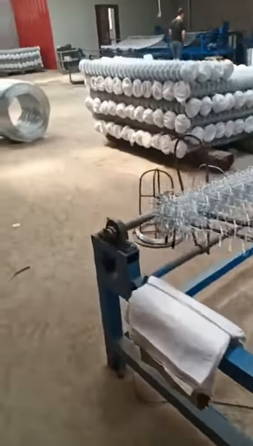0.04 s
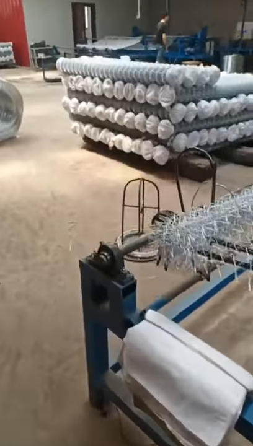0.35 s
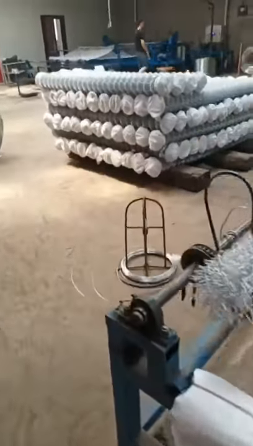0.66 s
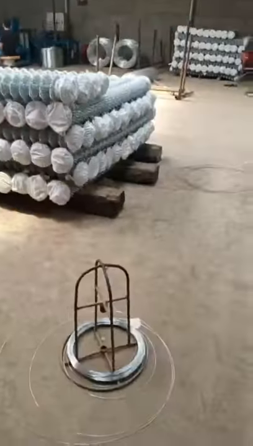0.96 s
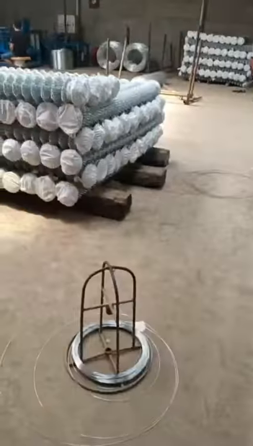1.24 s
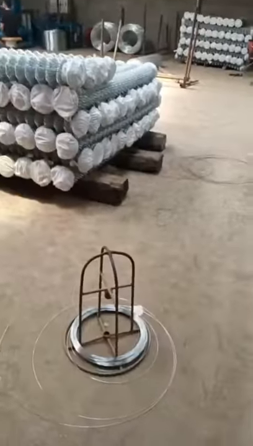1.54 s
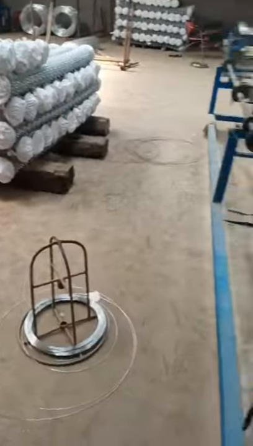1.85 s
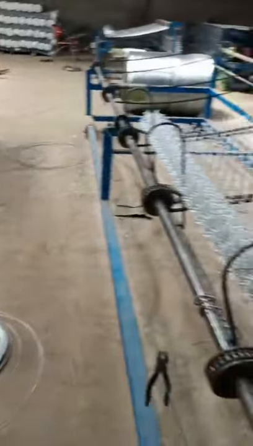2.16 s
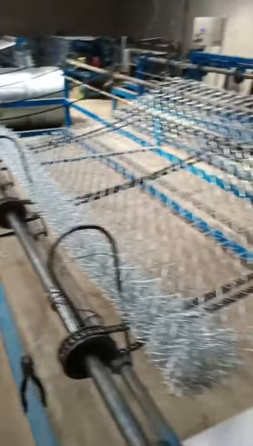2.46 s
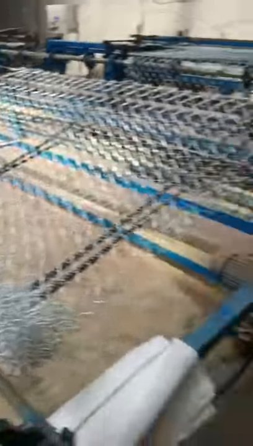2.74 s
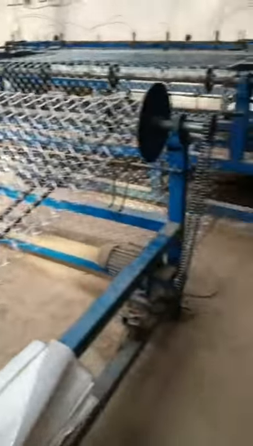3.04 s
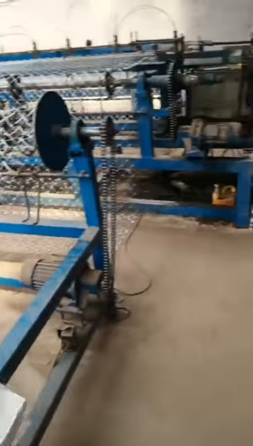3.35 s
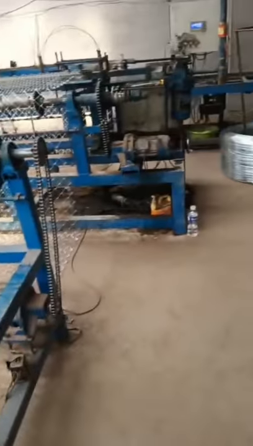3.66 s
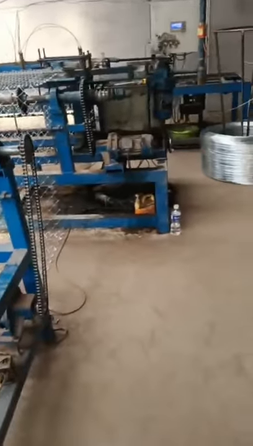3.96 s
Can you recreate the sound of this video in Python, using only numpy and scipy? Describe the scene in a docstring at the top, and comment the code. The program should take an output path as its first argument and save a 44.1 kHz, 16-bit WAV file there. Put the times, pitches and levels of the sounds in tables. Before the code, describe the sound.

Dense metallic din of wire weaving machines, with hissing wire and a few heavy crashes.

```python
"""Wire-mesh weaving machines run in a hard factory hall while a microphone is carried past them.
From the start, drives rumble, far machines roar, metal knocks merge into a din and wire hisses over
spinning formers. Near 0.6 s a heavy stroke crashes and steel clinks; then the sound cuts out briefly.
From 1 s on come more strokes and dull clunks of frames, and from 2.5 s air buffets the microphone.
Near 3 s a wire squeals between two small dips in level, and the brightest crash follows at 3.3 s."""
import sys
import numpy as np
from scipy import signal
from scipy.fft import rfft, irfft
from scipy.io import wavfile
from scipy.ndimage import uniform_filter1d

SR = 44100
rng = np.random.default_rng(int(sys.argv[2]) if len(sys.argv) > 2 else 0)


def digitize_waveform(pressure):
    """Quantize a signal to 16-bit integers and store it at the path in sys.argv[1].

    Rows of a 2-D input are taken as channels; values are limited to [-1, 1].
    """
    field = np.atleast_2d(pressure).T
    bounded = np.clip(field, -1, 1)
    quanta = np.round(bounded * 32767).astype(np.int16)
    wavfile.write(sys.argv[1], SR, quanta)


N = 176400  # 4 seconds

# the deep sound of shaking machine frames (frequency [Hz], relative level [dB])
FRAME_SPECTRUM = [(25, -36), (40, -40), (60, -13.5), (85, -7), (130, -1), (235, -2), (320, .3), (420, -3),
                  (540, -13.5), (800, -42), (1600, -60)]
# how metal knocks, both in the clatter and in the heavy strokes
METAL_KNOCKS = dict(per_second=900, spread_db=3.1, decay_s=0.021, wash_db=2)
OPPOSITE_SIDES = np.array([[1], [-1]])  # plus on the left, minus on the right


def undb(db):
    """Turn decibels into a factor to multiply a sound by."""
    return 10 ** (np.asarray(db) / 20)


def unit(x):
    """Scale a sound to an average strength (rms) of 1."""
    return x / np.sqrt(np.mean(x ** 2))


def clock():
    """The time of every sample in seconds."""
    return np.arange(N) / SR


def curve(rows, column=1):
    """One column of a table, joined by straight lines in time."""
    rows = np.array(rows)
    return np.interp(clock(), rows[:, 0], rows[:, column])


def response(points):
    """Join (frequency [Hz], level [dB]) points into a level for every frequency."""
    hz, db = np.array(points).T
    all_hz = np.maximum(np.fft.rfftfreq(N, 1 / SR), 1)
    return np.interp(np.log(all_hz), np.log(hz), db)


def colour(x, spectrum):
    """Give a sound a spectrum (its balance of low and high), at a strength of 1."""
    return unit(irfft(rfft(x) * undb(response(spectrum)), N))


def noise():
    """Unrelated noise for left and right."""
    return rng.standard_normal((2, N))


def drift(per_second):
    """A smooth random wobble with a typical size of 1."""
    hold = int(SR / per_second)
    steps = np.repeat(rng.standard_normal(2048)[:N // hold + 1], hold)
    return unit(uniform_filter1d(uniform_filter1d(steps, hold), hold)[:N])


def tone(hz, wander, per_second):
    """A pure note whose pitch drifts by the fraction `wander`."""
    pitch_hz = hz * (1 + wander * drift(per_second))
    return np.sqrt(2) * np.sin(2 * np.pi * np.cumsum(pitch_hz) / SR)


def envelope(start, rise_s, decay_s):
    """Loudness that rises in a straight line, then dies away."""
    age = clock() - start
    return np.clip(age / rise_s, 0, 1) * np.exp(-np.maximum(age - rise_s, 0) / decay_s)


def swell(start_s, length_s):
    """Loudness that rises and falls in a rounded arch."""
    progress = np.clip((clock() - start_s) / length_s, 0, 1)
    return 2 * np.sqrt(progress * (1 - progress))


def impacts(per_second, spread_db, decay_s, wash_db, places=4):
    """Many uneven hits at a few places, each place with its own echoes, over the hall's wash of noise."""
    size = undb(spread_db * np.minimum(rng.exponential(size=N), 5))
    push_or_pull = np.sign(rng.standard_normal(N))
    hits = (rng.random(N) < per_second / SR) * size * push_or_pull
    place = rng.integers(0, places, N)
    age = clock()[:SR // 10]
    heard = 0
    for k in range(places):
        echoes = rng.standard_normal((2, len(age))) * np.exp(-age / decay_s)
        heard = heard + signal.oaconvolve((hits * (place == k))[None], echoes, axes=1)[:, :N]
    return unit(unit(heard) + undb(wash_db) * noise())


def diffuse(pair, split_hz=520):
    """In the hall, left and right hear the same bass but unrelated treble."""
    middle, side = rfft(pair)
    alike = 1 / (1 + (np.fft.rfftfreq(N, 1 / SR) / split_hz) ** 6)
    mixed = middle * np.sqrt(1 + alike) + OPPOSITE_SIDES * side * np.sqrt(1 - alike)
    return irfft(mixed, N) / np.sqrt(2)


def drives():
    """Frames and gearboxes rumble; motors hum and gears whine through the hall."""
    # how loud the rumble is (time [s], relative level [dB])
    rumble_levels = [(0, -37), (.85, -36.5), (1.2, -35.5), (1.95, -37.5), (2.3, -40.5), (2.7, -36.5),
                     (3.25, -36.5), (3.55, -35.5), (4, -40)]
    # motor and gear notes (pitch [Hz], level [dB], wander [fraction of pitch])
    motor_notes = [(150.1, -50.5, 0.039), (197.9, -49.5, 0.0123), (1754, -49, 0.0018)]
    middle, side = colour(noise(), FRAME_SPECTRUM)
    rumble = middle + undb(-20) * side * OPPOSITE_SIDES  # almost the same on both sides
    out = rumble * undb(1 + curve(rumble_levels))
    for hz, db, wander in motor_notes:
        hum = [tone(hz, wander, per_second=39.88) * (1 + 0.34 * drift(7.93)) for _ in range(2)]
        out = out + undb(db) * diffuse(np.array(hum))
    return out


def far_machines():
    """The hall blurs the far machines into a dull roar."""
    # how loud the roar is (time [s], relative level [dB])
    roar_levels = [(0, -37.5), (.85, -36.5), (1.5, -37), (2.15, -42), (2.8, -38.5), (3.2, -40), (4, -40.5)]
    # the roar's dull sound (frequency [Hz], relative level [dB])
    roar_spectrum = [(150, -23), (420, -2), (800, 3), (1150, 3), (1700, -8), (4000, -38)]
    roar = colour(diffuse(noise()), roar_spectrum)
    return roar * undb(2 + curve(roar_levels) + 0.37 * drift(26.2))


def clatter():
    """Chains, cams and mesh knock hundreds of times a second, and some of the metal rings on."""
    # how loud the din is (time [s], relative level [dB])
    din_levels = [(0, -32.5), (.55, -34), (.8, -33), (1.45, -31), (2.0, -31.5), (2.2, -32.5), (3.2, -31),
                  (3.6, -30.5), (4, -31)]
    # the din's hard, bright sound (frequency [Hz], relative level [dB])
    din_spectrum = [(300, -23.5), (600, -11), (900, -5), (1350, 0.4), (2250, 0.5), (4100, -0.1), (4500, -4),
                    (5000, -11.5), (7000, -11.5), (15000, -45)]
    knocks = colour(diffuse(impacts(**METAL_KNOCKS)), din_spectrum)
    flicker_db = .45 * drift(18)
    din = knocks + undb(-9.5) * ringing_metal()
    return din * undb(5.5 + curve(din_levels) + flicker_db)


def ringing_metal(per_second=110, decay_s=0.027, low_hz=1607.4, high_hz=4298):
    """Struck wires and rods ring briefly, each at its own pitch."""
    out = np.zeros((2, N + SR))
    age = clock()[:SR // 5]
    fade_in = np.minimum(age / .002, 1)
    for when, pitch, size, left_phase, right_phase in rng.random((int(per_second * N / SR), 5)):
        hz = low_hz + pitch * (high_hz - low_hz)
        cycles = hz * age + np.array([[left_phase], [right_phase]])
        ring = np.sin(2 * np.pi * cycles) * np.exp(-age / decay_s)
        start = int(when * N)
        out[:, start:start + len(age)] += (.5 + size) * ring * fade_in
    return unit(out[:, :N])


def running_wire(turns_per_second=16.72, peak_s=1.033):
    """Wire scrapes over the formers (the spinning parts that bend it), surging once a turn."""
    # how loud the wire is (time [s], relative hiss level [dB], relative sizzle level [dB])
    wire_levels = [(0, -32, -37.5), (.2, -32, -40), (.47, -34, -40.5), (.68, -34.5, -42.5),
                   (.78, -31, -36.5), (.93, -29, -33), (1.95, -27.5, -31), (2.35, -28, -31.5),
                   (2.55, -28, -34.5), (2.9, -28.5, -34), (3.07, -26.5, -33), (3.3, -27.5, -34),
                   (3.8, -26, -32.5), (4, -28, -35.5)]
    # the wire's hiss (frequency [Hz], relative level [dB])
    hiss_spectrum = [(2500, -37), (4400, -9.5), (5100, -11), (6100, -8.5), (6900, -4.5), (7500, -1.3),
                     (7900, 0), (8400, -6), (9000, -11.5), (13000, -26.5)]
    # the even higher sizzle (frequency [Hz], relative level [dB])
    sizzle_spectrum = [(6000, -23), (8500, -9), (9600, -3), (13500, 1.5), (15500, 0.5)]
    surge = np.cos(2 * np.pi * turns_per_second * (clock() - peak_s))
    flicker_db = 0.64 * drift(24.64)
    scrapes = dict(per_second=2500, spread_db=2.1, decay_s=0.0045, wash_db=2)
    hiss = colour(impacts(**scrapes), hiss_spectrum)
    sizzle = colour(impacts(**scrapes), sizzle_spectrum)
    hiss_db = 3.5 + curve(wire_levels, column=1) + .45 * surge + flicker_db
    sizzle_db = 5 + curve(wire_levels, column=2) + .9 * surge + flicker_db
    return hiss * undb(hiss_db) + sizzle * undb(sizzle_db)


def heavy_strokes():
    """Heavy machine strokes, smeared by the hall: the frame booms and knocks, the mesh crashes."""
    # each stroke (start [s], rise [s], decay [s], boom [dB], knock [dB], crash [dB])
    strokes = [(.562, .028, .13, -32.5, -29.5, -28), (1.02, .018, .11, -33, -30, -33),
               (2.745, .015, .08, -33.5, -38, -40), (3.305, .014, .18, -48, -35, -23.3),
               (3.35, .025, .15, -36.5, -32.5, -37)]
    # the frame's knock (frequency [Hz], relative level [dB])
    knock_spectrum = [(200, -18), (450, -0.5), (720, 1), (1000, -5.5), (1350, 4), (2500, -29)]
    # the mesh's crash (frequency [Hz], relative level [dB])
    crash_spectrum = [(300, -17), (900, -8.5), (1900, 4), (2900, 0), (4000, 2.5), (4900, -4), (15000, -32)]
    boom = colour(diffuse(noise()), FRAME_SPECTRUM)
    knock = colour(diffuse(noise()), knock_spectrum)
    crash = colour(impacts(**METAL_KNOCKS), crash_spectrum)
    out = 0
    for start, rise_s, decay_s, boom_db, knock_db, crash_db in strokes:
        stroke = undb(boom_db) * boom + undb(knock_db) * knock + undb(crash_db) * crash
        out = out + envelope(start, rise_s, decay_s) * stroke
    return out


def steel_clinks(rise_s=.008):
    """Struck steel parts ring at their own pitch, wavering slightly and differently on left and right."""
    # clanks of bars and clinks of wire (start [s], pitch [Hz], level [dB], decay [s])
    clinks = [(.585, 694, -27.5, .04), (.583, 872, -31, .03), (.59, 3790, -25, .022), (.59, 4090, -29, .03),
              (.668, 4090, -29.5, .04)]
    out = 0
    for start, hz, db, decay_s in clinks:
        ring = np.array([tone(hz, wander=.007, per_second=300) for _ in range(2)])
        out = out + undb(db) * envelope(start, rise_s, decay_s) * ring
    return out


def frame_clunks(rise_s=.014, decay_s=.045):
    """Rollers and frame parts are jolted; each gives a short, dull note."""
    # each jolt (start [s], pitch [Hz], level [dB])
    clunks = [(1.07, 135, -32), (1.225, 195, -33), (1.445, 345, -33), (1.51, 382, -32), (1.575, 310, -33),
              (2.75, 410, -32.5), (2.805, 150, -30), (3.362, 85, -34)]
    return sum(undb(db) * envelope(start, rise_s, decay_s) * tone(hz, wander=.06, per_second=100)
               for start, hz, db in clunks)


def air_gusts():
    """Air buffets the microphone as it swings round, in low gusts that differ left and right."""
    # the deep sound of the gusts (frequency [Hz], relative level [dB])
    gust_spectrum = [(35, -28), (80, 3), (220, -34)]
    gusts = colour(noise(), gust_spectrum) * undb(-47.5 + 2 * drift(10))
    return gusts * swell(start_s=2.52, length_s=.96)


def wire_squeal():
    """A wire sticks and slips in its guide, making a thin, stuttering note."""
    # each burst of the squeal (start [s], length [s], level [dB])
    bursts = [(2.995, .055, -25.5), (3.05, .095, -29), (3.175, .04, -30.5)]
    note = tone(hz=8265, wander=.0012, per_second=150) * (1 + 0.3 * drift(59.6))
    note = note * sum(undb(db) * swell(start, length) for start, length, db in bursts)
    return np.array([np.roll(note, 1), note])  # reaches the right side one sample sooner


def scene():
    """All the machinery, and the air at the microphone."""
    steady = drives() + far_machines() + clatter() + running_wire()
    return steady + heavy_strokes() + frame_clunks() + steel_clinks() + wire_squeal() + air_gusts()


def record(dry):
    """The microphone colours each side; the sound cuts out once, dips twice and loses its top treble."""
    # how the microphone's two openings differ (frequency [Hz], left minus right [dB])
    side_balance = [(200, -0.5), (380, 3), (570, 3.5), (850, 1.5), (1300, 3), (1800, 3.5), (3000, 1.5),
                    (4000, 6), (4900, 0.5), (6700, 2), (7900, -6), (8600, -8.5), (10500, -3), (15000, 1)]
    # brief dips in level (time [s], half width [s], level change [dB])
    dips = [(2.895, .014, -2.5), (3.275, 0.0099, -2.5)]
    coloured = irfft(rfft(dry) * undb(OPPOSITE_SIDES * response(side_balance) / 2), N)
    t = clock()
    off_s, on_s, floor_db = .698, .767, -56
    cutout_times = [off_s - .002, off_s + .003, off_s + .025, on_s - .004, on_s]
    cutout_db = np.interp(t, cutout_times, [0, floor_db / 2, floor_db, floor_db, 0])
    dips_db = sum(db * np.exp(-((t - at) / width) ** 2) for at, width, db in dips)
    treble_cut = signal.ellip(10, .2, 70, 15550, fs=SR, output="sos")  # steep, above 15550 Hz
    return signal.sosfilt(treble_cut, coloured * undb(cutout_db + dips_db))


dry = scene()
out = record(dry)
digitize_waveform(out)
```